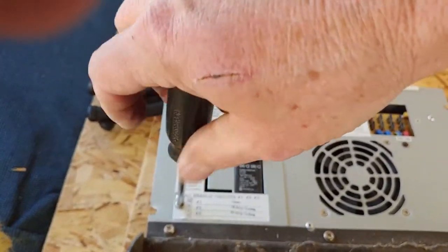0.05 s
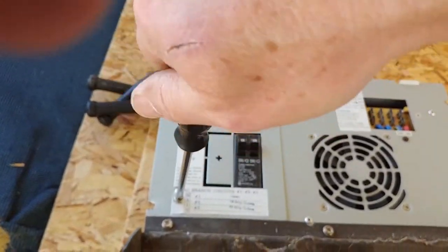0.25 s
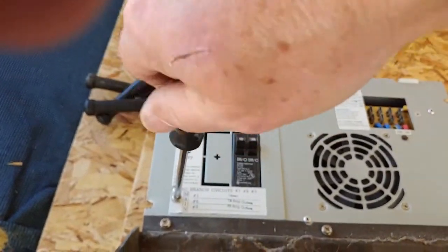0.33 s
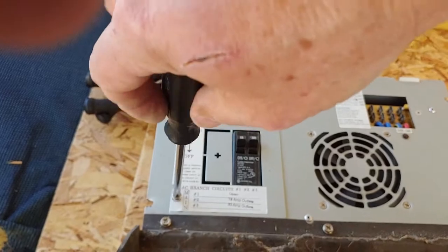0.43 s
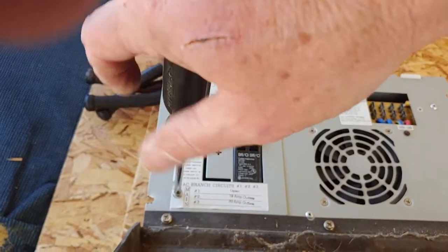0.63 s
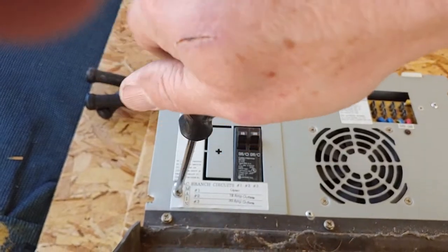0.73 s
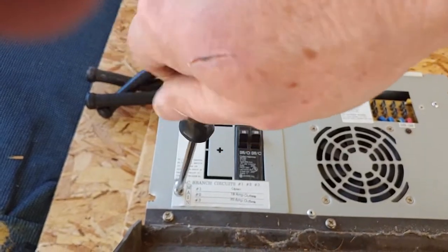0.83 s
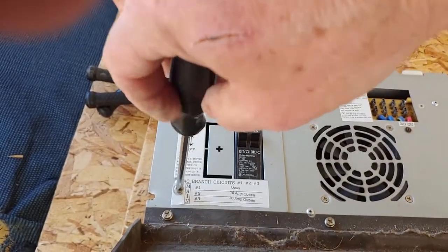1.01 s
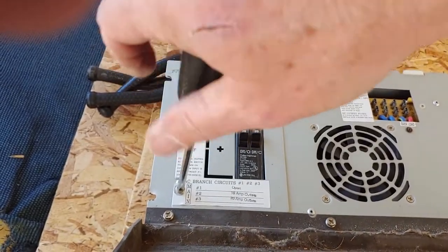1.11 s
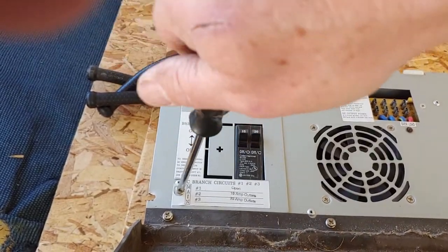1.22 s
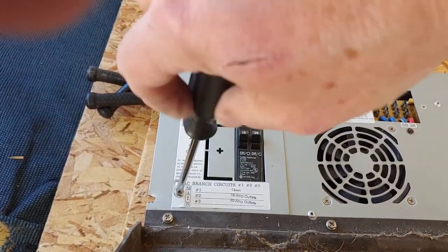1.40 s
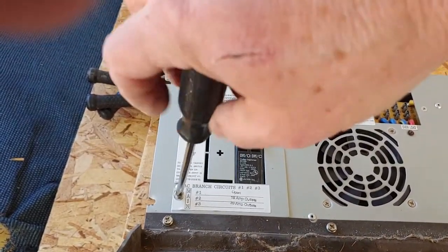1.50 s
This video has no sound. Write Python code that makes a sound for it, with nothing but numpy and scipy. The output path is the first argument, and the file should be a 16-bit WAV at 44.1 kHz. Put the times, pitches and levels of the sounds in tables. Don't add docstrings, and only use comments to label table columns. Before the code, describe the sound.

A screwdriver loosens a stiff screw in a sheet-metal case: a light tick, a quick rattling thump on the bench, short creaks, then a sharp snap and louder creak, close stereo microphone in a quiet room.

```python
import sys
import numpy as np
from scipy import signal
from scipy.fft import rfft, irfft, next_fast_len
from scipy.io import wavfile
from scipy.ndimage import map_coordinates

SR = 44100
rng = np.random.default_rng(int(sys.argv[2]) if len(sys.argv) > 2 else 0)


def to_linear_factor(level_db):
    exponent = np.asarray(level_db, float) / 20
    return 10 ** exponent


def pcm_store(signal):
    levels = np.round(np.clip(np.atleast_2d(signal), -1, 1) * 32767)
    wavfile.write(sys.argv[1], SR, levels.astype(np.int16).T)


N = 68355


def unit(x):
    return x / np.sqrt(np.mean(x ** 2) + 1e-20)


def along(points, hz):
    point_hz, value = np.transpose(points)
    return np.interp(np.log(hz + 1), np.log(point_hz + 1), value)


def filtered(x, response):
    n = x.shape[-1]
    size = next_fast_len(n + SR // 2)
    spectrum = rfft(x, size) * response(np.fft.rfftfreq(size, 1 / SR))
    return irfft(spectrum, size)[..., :n]


def noise(spectrum, shape=N):
    white = rng.standard_normal(shape)
    return unit(filtered(white, lambda hz: to_linear_factor(along(spectrum, hz))))


def pair(spectrum):
    alike = 0.15
    shared, left, right = noise(spectrum, (3, N))
    return np.sqrt(alike) * shared + np.sqrt(1 - alike) * np.array([left, right])


def through(force, modes):
    node_hz = 220
    scatter_hz = 1140
    rise_s = 0.00084
    t = np.arange(SR // 2) / SR
    turn = rng.uniform(-0.37, 1, len(modes))
    ring = np.zeros((2, len(t)))
    for u, (hz, db, t60) in zip(turn, modes):
        phase = np.array([[u], [-u]]) * np.pi / 2 * min(hz / scatter_hz, 1) ** 2
        fading = np.sign(hz - node_hz) * to_linear_factor(db - 60 * t / t60)
        ring += fading * np.sin(2 * np.pi * hz * t + phase)
    ring *= 1 - np.exp(-t / rise_s)
    return signal.fftconvolve(force[None], ring, axes=1)[:, :N]


def blows(rows):
    force = np.zeros(N)
    force[[round(s * SR) for s, _ in rows]] = to_linear_factor([db for _, db in rows])
    return force


def pushes(rows):
    force = np.zeros(N + SR)
    for s, db, contact_ms, way in rows:
        u = np.arange(1500) / SR / contact_ms * 1000
        shape = u ** 2 * np.exp(-2 * u)
        force[round(s * SR):][:1500] += np.sign(way) * to_linear_factor(db) * shape / shape.sum()
    return force[:N]


def swell(start, peak, end):
    angle = np.interp(np.arange(N) / SR, [start, peak, end], [0, np.pi / 2, np.pi])
    return np.sin(angle) ** 2


def efforts(rows, column):
    return sum(to_linear_factor(row[column]) * swell(*row[:3]) for row in rows)


def dying(decays, channels):
    white = rng.standard_normal((channels, SR // 2))
    hz, t, z = signal.stft(white, SR, nperseg=256)
    fading = z * to_linear_factor(-60 * t / along(decays, hz)[:, None])
    tail = signal.istft(fading, SR, nperseg=256)[1][:, :SR // 2]
    return tail / np.linalg.norm(tail[0])


def banded(x):
    spacing_hz, depth_db = 200, 3
    knots = rng.standard_normal((2, int(SR / 2 / spacing_hz) + 4))

    def bands(hz):
        return to_linear_factor(depth_db * np.array([map_coordinates(k, [hz / spacing_hz]) for k in knots]))
    return filtered(x, bands)


# pitch_hz [Hz], level_db [dB per Hz]
HUM_COLOUR = [(20, -21), (35, -13.5), (60, 5), (150, -4), (400, -15), (1000, -20.5), (2500, -36.5),
              (5000, -45), (12300, -52), (12900, -59.5)]
# pitch_hz [Hz], likeness [-1 to 1]
HUM_LIKENESS = [(60, 0.89), (300, 0.84), (1000, 0.077), (3000, 0.062)]


def hum():
    level_db, sway_db, sway_hz = -57.5, 0.5, 8

    def half_angle(hz):
        return np.arccos(np.clip(along(HUM_LIKENESS, hz), -1, 1)) / 2

    def widen(hz):
        return np.array([np.cos(half_angle(hz)), np.sin(half_angle(hz))])
    mid, side = filtered(noise(HUM_COLOUR, (2, N)), widen)
    sway = map_coordinates(rng.standard_normal(20), [np.arange(N) * sway_hz / SR])
    return to_linear_factor(level_db + sway_db * sway) * np.array([mid + side, mid - side])


# start_s [s], level_db [dB], pitch_hz
# [Hz], # decay_s [s to fall 60 dB], spread [share of the pitch]
TICK_TONES = [(.1, -55, 369, .4, 0.049), (.35, -61, 1917, 0.25, 0.13), (1.204, -48, 700, 0.054, 0.16),
              (1.085, -64, 1604, 0.09, 0.042), (0.406, -70, 6695, 0.043, .1),
              (0.4283, -71, 6870, 0.014, 0.062), (0.434, -61, 7400, 0.0134, 0.17),
              (0.434, -61.5, 3720, 0.013, 0.22), (.97, -69.5, 8830, 0.029, 0.53),
              (1.067, -52.5, 1720, 0.1, 0.12), (1.069, -52.5, 1000, 0.046, 0.53),
              (1.07, -63, 3040, 0.036, 0.18), (1.094, -66, 6400, .012, 0.12), (1.092, -63, 2800, 0.02, 0.34),
              (1.161, -55.5, 6900, 0.015, 0.13), (0.735, -67, 2020, 0.44, 0.21),
              (1.162, -63, 3170, 0.18, 0.046), (1.16, -71, 4270, 0.19, 0.25),
              (1.434, -63, 2110, 0.034, 0.18), (1.434, -72.5, 3900, .03, 0.075)]


def ticks():
    out, t = np.zeros((2, N + SR)), np.arange(SR // 8) / SR
    for s, db, hz, t60, spread in TICK_TONES:
        ring = 0
        for off, phase, u in rng.uniform(-1, 1, (24, 3)):
            tone_hz = hz * (1 + spread * off)
            ring = ring + np.sin(2 * np.pi * tone_hz * t + 3 * phase + np.array([[u], [-u]])) / 4
        fading = to_linear_factor(db - 60 * t / t60) * (1 - np.exp(-t * 30 / t60))
        out[:, round(s * SR):][:, :len(t)] += fading * ring
    return out[:, :N]


# pitch_hz [Hz], level_db [dB per Hz]
RATTLE_COLOUR = [(500, -5), (1000, -12.5), (2000, -15.5), (3000, -22), (5000, -30), (8500, -35),
                 (12400, -50), (12700, -84)]
# pitch_hz [Hz], decay_s [s to fall 60 dB]
RATTLE_DECAY = [(500, 0.26), (2000, 0.26), (4000, 0.12), (12000, 0.2)]
# start_s [s], force_db [dB], contact_ms [ms], rattle_db [dB]
CASE_THUMPS = [(0.212, -38, 0.14, -18.5), (.2165, -37.5, 0.12, -25.5), (0.2258, -25.5, 0.29, -17),
               (0.2313, -24.5, 0.32, -17), (0.2414, -16.5, 0.48, -14), (0.2527, -20, 0.47, -18.5),
               (0.2629, -21, 0.64, -37), (0.277, -17, 1.07, -43), (.305, -26.5, 0.74, -26),
               (0.318, -26.5, 0.78, -42), (.33, -44, 0.84, -41), (.378, -34, 1.3, -75),
               (0.419, -30, 2.04, -50), (.455, -31.5, 2.63, -51.5), (1.202, -43.5, 0.65, -80)]


def rattle():
    level_db, rise_s = 26, 0.0012
    dull_hz = 3340
    chatter_hz, chatter_db = 350, 3
    rise = np.clip(np.arange(SR // 2) / SR / rise_s, 0, 1)
    shake = 0
    for s, _, _, rattle_db in CASE_THUMPS:
        tails = dying(RATTLE_DECAY, channels=3) * rise
        if s < CASE_THUMPS[2][0]:
            tails = signal.lfilter(*signal.butter(3, dull_hz, fs=SR), tails)
        shared, left, right = tails
        ports = shared + np.array([left, right])
        shake = shake + signal.fftconvolve(blows([(s, rattle_db)])[None], ports, axes=1)[:, :N]
    knots = rng.standard_normal(N * chatter_hz // SR + 4)
    shake = shake * to_linear_factor(chatter_db * map_coordinates(knots, [np.arange(N) * chatter_hz / SR]))
    colour = [(250, -52)] + RATTLE_COLOUR
    return to_linear_factor(level_db) * filtered(banded(shake), lambda hz: to_linear_factor(along(colour, hz)))


def shudder():
    start_s, level_db, t60, pitch_hz = 0.28, -74.5, 0.42, 190
    since = np.arange(N) / SR - start_s
    fading = to_linear_factor(level_db - 60 * since / t60) * np.clip(since / 0.067, 0, 1)
    return fading * noise([(pitch_hz, 0), (3 * pitch_hz, -30), (5000, -90)])


# pitch_hz [Hz], level_db [dB], decay_s [s to fall 60 dB]
BENCH_MODES = [(171.3, -1.5, 0.16), (176, -20.5, 0.034), (274.5, -21, 0.25), (316.2, -12, 0.23),
               (370.3, -2, 0.085), (395, 5, 0.049), (474, -8.5, 0.17), (636.5, -13, 0.13),
               (711, -9.5, 0.068), (851, -14.5, 0.23)]
# start_s [s], force_db [dB], contact_ms [ms],
# direction [1 pressed, -1 released]
CASE_BOUNCES = [(.2255, -26.5, 0.33, 1), (.2305, -18.5, 2.8, -1), (.2575, -18, 1.77, -1),
                (.2835, -26.5, 2.3, 1), (.297, -20, 2.7, -1), (.3255, -22.5, 2, 1), (.3665, -21.5, 3.36, 1),
                (.408, -26, 2.53, 1), (.449, -41, 1.4, 1), (.49, -44, 1.2, 1), (.47, -43, 1.2, -1),
                (.595, -46.5, 1, 1), (.625, -46.5, 1.5, 1), (.757, -47.5, 3, 1), (1.184, -43.5, 1.7, 1),
                (1.344, -49, 2.6, -1), (1.384, -49.5, 1, -1)]
# pitch_hz [Hz], level_db [dB], decay_s [s to fall 60 dB]
LEG_MODES = [(49.54, -9.5, 0.24), (79.2, 0.5, 0.1194), (108.6, -0.5, 0.13)]


def thumps():
    force = pushes([(*row[:3], 1) for row in CASE_THUMPS]) + shudder()
    return through(force, BENCH_MODES) - through(pushes(CASE_BOUNCES), LEG_MODES) + rattle()


# start_s [s], peak_s [s], end_s [s], creak_db [dB], rub_db [dB]
THREAD_TURNS = [
    (0.711, 0.762, 0.8, -48.5, -81.5),
    (0.764, 0.79, 0.79, -40.5, -74.5),
    (0.788, 0.812, 0.857, -39, -70.5),
    (0.906, 0.962, 1.02, -109, -83),
    (1.143, 1.175, 1.264, -52.5, -71),
    (1.173, 1.234, 1.24, -40, -71.5),
    (1.245, 1.286, 1.321, -30.5, -66),
    (1.29, 1.32, 1.49, -72, -80),
]
# start_s [s], level_db [dB]
THREAD_JERKS = [(.783, -50.5), (.7905, -54), (.7962, -41.5), (.801, -45.5), (.8105, -49), (.8175, -46),
                (.8235, -48.5), (.843, -62), (.857, -58.5), (1.076, -56), (1.2045, -51.5), (1.2205, -44.5),
                (1.2585, -55), (1.269, -37), (1.2835, -34), (1.297, -40), (1.303, -42), (1.315, -50.5),
                (1.331, -51.5), (1.359, -54)]
# pitch_hz [Hz], level_db [dB], decay_s [s to fall 60 dB]
GROAN_MODES = [(425.4, -9, 0.21), (482.9, -2, 0.22), (505, 1, 0.06), (632, 1.5, 0.098), (700, -2, 0.025),
               (856, -6.5, 0.053), (1000, -9, .05), (1162, -8, 0.067), (1410, -15.5, 0.094),
               (1671, -6.5, 0.054), (1939, -6, 0.051), (2175, -11.5, 0.035), (2460, -18.5, 0.036),
               (2634, -21, 0.049)]


def creaks():
    slips_hz, spread_db = 900, 3
    grain_hz = 2500
    grain_db, jerk_db = -27, 2.5
    chance = rng.random((3, N))
    happens = chance[0] < slips_hz / SR
    size = to_linear_factor(-spread_db * np.log(chance[2] + 0.0013))
    slips = unit(happens * np.sign(chance[1] - .5) * size)
    grains = filtered(efforts(THREAD_TURNS, 3) * slips, lambda hz: 1j * hz / (grain_hz + 1j * hz))
    jerks = np.convolve(blows(THREAD_JERKS), np.hanning(31) / 15)[:N]
    return through(to_linear_factor(grain_db) * grains + to_linear_factor(jerk_db) * jerks, GROAN_MODES)


# pitch_hz [Hz], level_db [dB per Hz]
RUB_COLOUR = [(1500, -4), (2200, -10), (3300, -1), (5000, -9), (6600, -4), (9000, -10), (12400, -10.5),
              (12700, -47)]


def rub():
    return banded(efforts(THREAD_TURNS, 4) * pair([(900, -40)] + RUB_COLOUR))


# start_s [s], peak_s [s], end_s [s], level_db [dB]
SHAFT_BRUSHES = [
    (.93, .955, .98, -105),
    (1.157, 1.165, 1.2, -106),
    (1.26, 1.28, 1.305, -102),
    (1.3, 1.325, 1.41, -101),
]
# pitch_hz [Hz], level_db [dB], decay_s [s to fall 60 dB]
SHAFT_MODES = [(6616, -9, .03), (9948, -12, .04), (11810, -4, .03), (13430, -5, .05), (14700, -9, .015),
               (15200, -7, .02), (15650, -5, .03)]


def shaft():
    return through(efforts(SHAFT_BRUSHES, 3) * rng.standard_normal(N), SHAFT_MODES)


# start_s [s], level_db [dB]
THREAD_SNAPS = [
    (1.2325, -25),
    (1.237, -32.5),
    (1.2445, -39),
    (1.251, -40),
]
# pitch_hz [Hz], level_db [dB], decay_s [s to fall 60 dB]
LID_MODES = [(429, -10.5, 0.17), (510, 0.5, 0.12), (633.4, -0.5, 0.13), (699, -1, 0.082),
             (851.4, -4.5, 0.095), (924, -4.5, 0.057), (1070, -32, 0.02), (1194, -16, 0.077),
             (1270, -32, 0.21), (1576, -12, 0.057), (2050, -7, 0.018), (2340, -27, 0.022),
             (2680, -15, 0.054), (3200, -51, 0.035)]
# pitch_hz [Hz], level_db [dB per Hz]
CRACK_COLOUR = [(500, 4.5), (1000, -3), (2000, -9), (3000, -27), (5000, -32.5), (6600, -28), (12500, -49.5),
                (13200, -96)]


def snaps():
    crack_db, crack_t60 = 18, 0.029
    force = blows(THREAD_SNAPS)
    jerk = np.convolve(force, np.hanning(15) / 7)[:N]
    fall = to_linear_factor(-60 * np.arange(3000) / SR / crack_t60)
    burst = signal.fftconvolve(force, fall)[:N] * pair([(100, 0)])
    colour = [(300, -7)] + CRACK_COLOUR
    crack = to_linear_factor(crack_db) * filtered(burst, lambda hz: to_linear_factor(along(colour, hz)))
    return through(jerk, LID_MODES) + crack


def thin_lows(x):
    low_hz = 380
    return filtered(x, lambda hz: (1j * hz / (low_hz + 1j * hz)) ** 2)


# pitch_hz [Hz], left_over_right_db [dB]
PORT_BALANCE = [(50, 2), (300, 1), (1500, -3.5), (2300, 2), (5000, -3), (7000, 2.5), (11700, -13)]


def at_ports(near):
    lag_s = 8 / SR
    side = np.array([[.5], [-.5]])

    def path(hz):
        return to_linear_factor(side * along(PORT_BALANCE, hz)) * np.exp(-2j * np.pi * hz * side * lag_s)
    return filtered(near, path)


# pitch_hz [Hz], decay_s [s to fall 60 dB]
ROOM_DECAY = [(100, 0.29), (1000, 0.17), (4000, 0.063), (12000, 0.046)]


def room(near):
    level_db, delay, low_hz = -11, 300, 400
    late = np.pad(near[0], (delay, 0))[None]
    answer = signal.fftconvolve(late, dying(ROOM_DECAY, channels=2), axes=1)[:, :N]
    return to_linear_factor(level_db) * filtered(answer, lambda hz: hz ** 2 / (hz ** 2 + low_hz ** 2))


def scene():
    thread = thin_lows(creaks() + shaft() + rub() + snaps())
    near = ticks() + thumps() + thread
    return hum() + at_ports(near) + room(near)


def low_pass(x):
    return signal.sosfilt(signal.butter(12, 15750, fs=SR, output="sos"), x)


def record(dry):
    low_hz = 22
    finished = filtered(dry, lambda hz: 1j * hz / (low_hz + 1j * hz))
    return low_pass(finished)


dry = scene()
out = record(dry)
pcm_store(out)
```